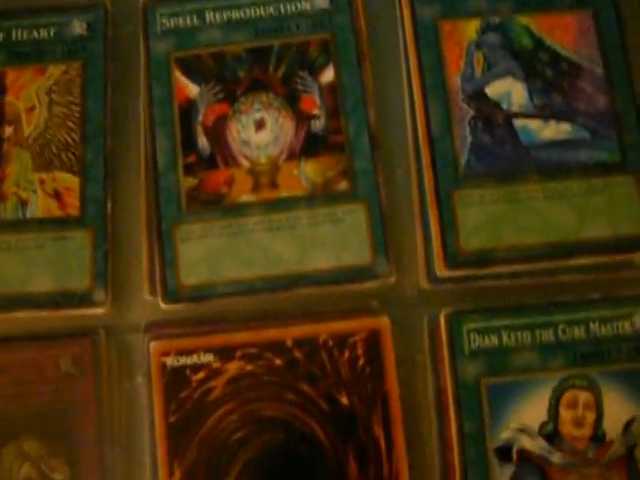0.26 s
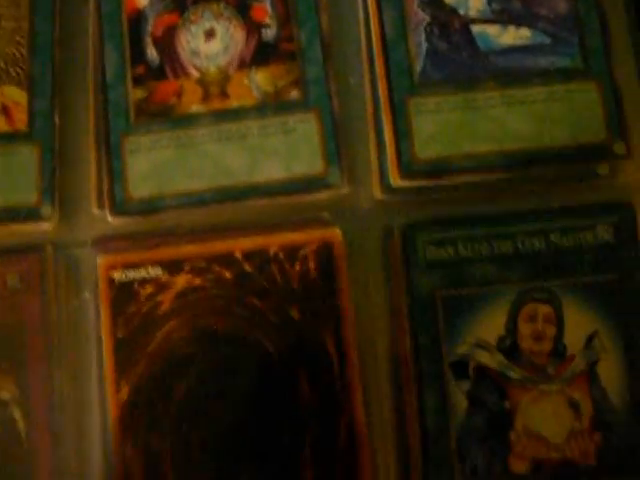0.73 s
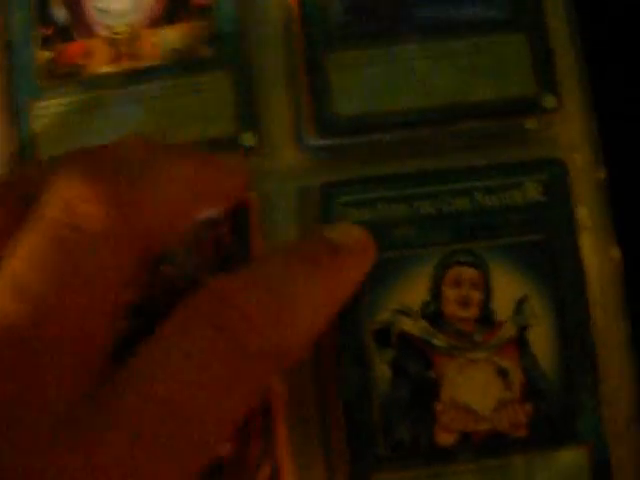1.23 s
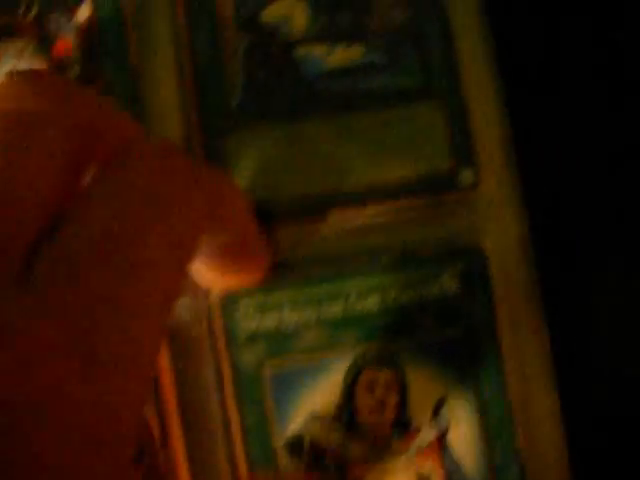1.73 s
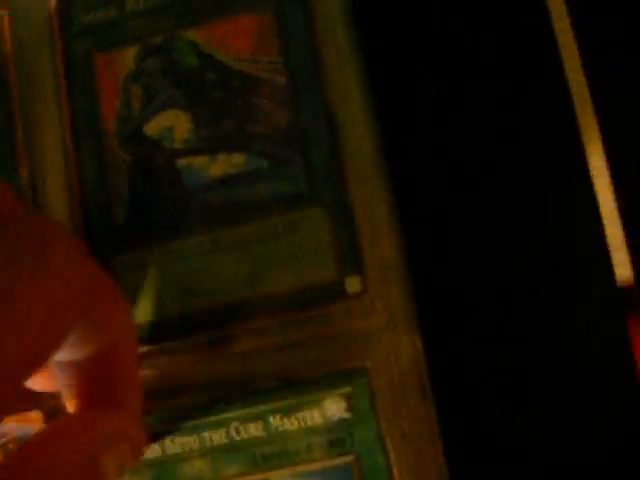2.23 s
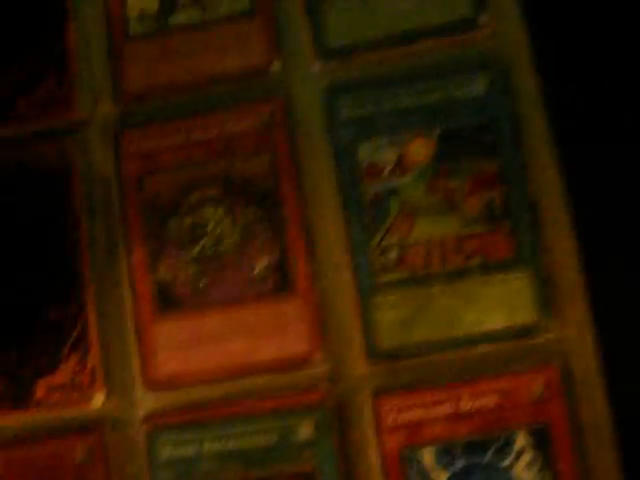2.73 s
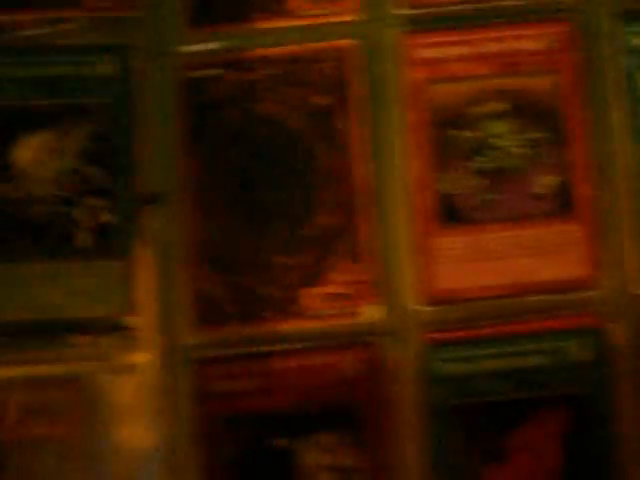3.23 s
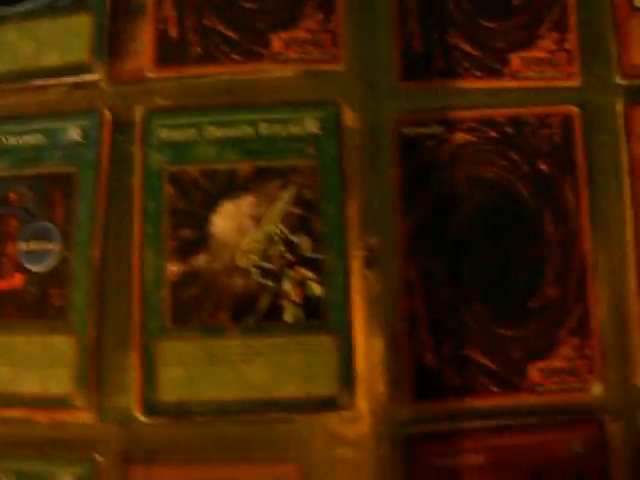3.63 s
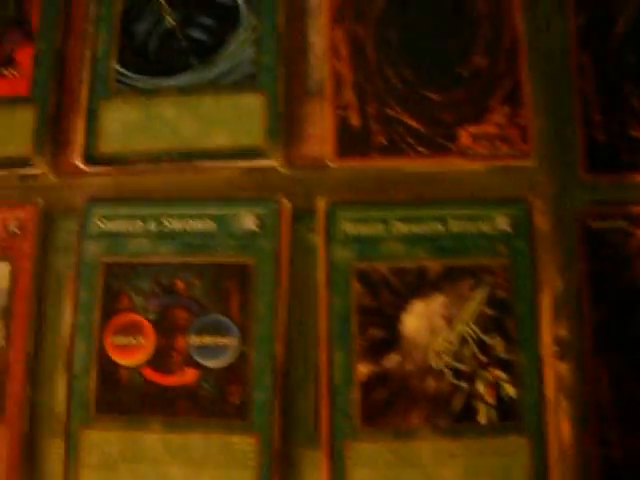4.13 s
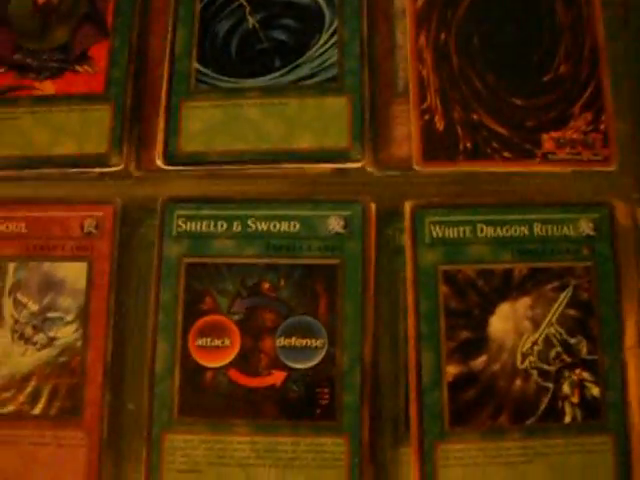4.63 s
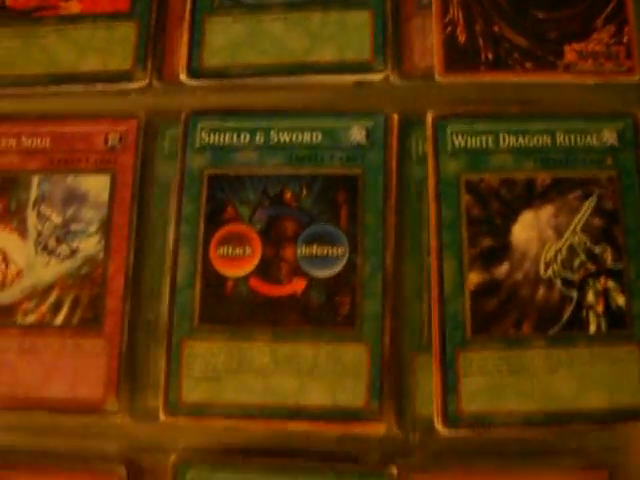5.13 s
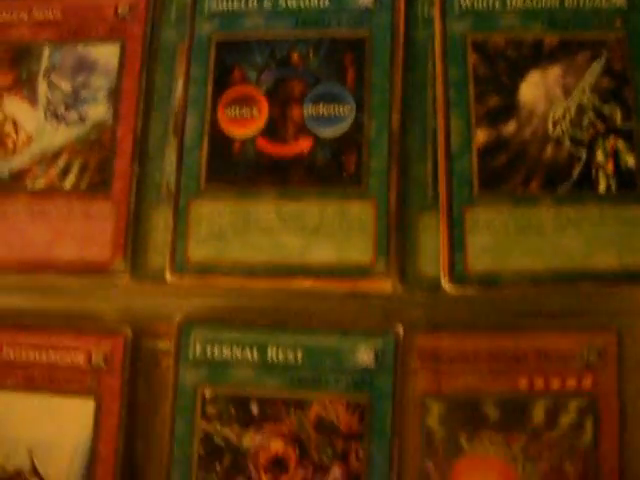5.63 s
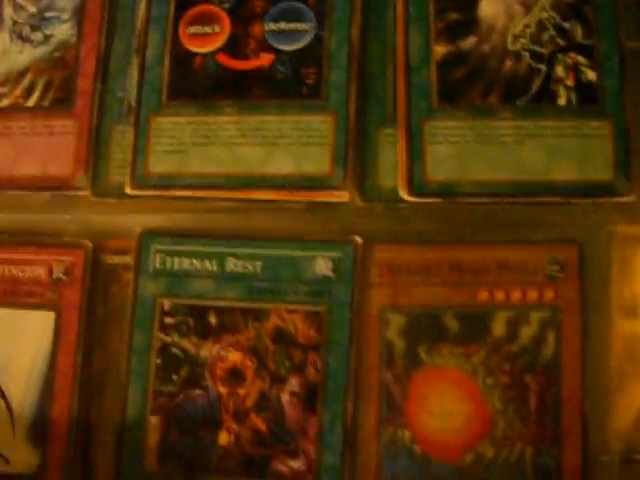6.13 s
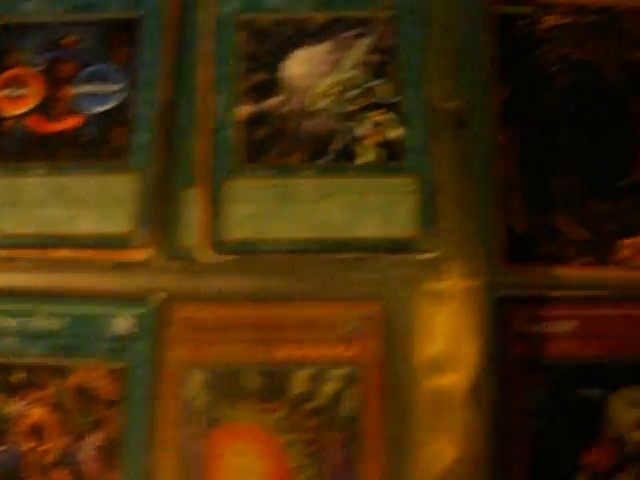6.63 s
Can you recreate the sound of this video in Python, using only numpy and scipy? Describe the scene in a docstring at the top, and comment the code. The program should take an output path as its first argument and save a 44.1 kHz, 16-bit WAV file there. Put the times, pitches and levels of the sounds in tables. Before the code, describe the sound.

Over constant hiss, a binder page of plastic card pockets is handled, giving irregular crackles, sharp pops and a few dull knocks.

```python
"""Microphone hiss, then plastic film crinkling: a hand works over a binder page of card sleeves.
The film slides in tiny stick-slips and rubs the page; the binder bumps softly on its support.
Pockets buckle with sharp snaps that ring film, page and binder in a small room.
A close camera picks it up, hears little above 4 kHz and overloads on the hardest snaps."""
import sys
import numpy as np
from scipy import signal
from scipy.fft import rfft, irfft, next_fast_len
from scipy.io import wavfile

SR = 44100
rng = np.random.default_rng(int(sys.argv[2]) if len(sys.argv) > 2 else 0)


def bounce(signal):
    """Save signal as a 16-bit WAV file at the path given by the first command-line argument."""
    frames = np.transpose(np.atleast_2d(signal))
    limited = np.clip(frames, -1, 1)
    pcm = np.round(limited * 32767).astype(np.int16)
    wavfile.write(sys.argv[1], SR, pcm)


N = 303408

# Pocket buckles. Small taut patch: bright. Clean flip: focused. The place sets the page knock.
# (time [s], film [dB], brightness [dB/octave], focus [dB], page [dB], page [Hz])
POCKET_SNAPS = [(1.799, -5, 9, 2.5, -6, 820), (1.8354, -12.5, 5, -5, -12.5, 690),
                (2.2066, 24, 5, 23.5, 15, 440), (2.3422, -0.5, 2, 15.5, 2, 830),
                (2.492, 26, -1, 4.5, 24, 930), (2.5134, 14, 7.5, 2.5, 22, 800),
                (2.6803, 7, -12, 4, 7.5, 1000), (2.702, -2, 8, 6, -4.5, 720),
                (2.739, -5, 9.5, -4, 4.5, 580), (2.7462, 5.5, 9, -7.5, 11, 560),
                (2.8333, 1.5, -8, 7, 11, 480), (2.9714, 0, -3, 2.5, 8, 710), (3.0199, 2.5, 1, 7, 8, 520),
                (3.0383, 10.5, 5, 8.5, 14, 430), (3.0409, 1, -17, 7, 21, 700),
                (3.0519, -7, -6, -3, 12, 690), (3.2528, -14, 17, -6, -3, 650),
                (3.5473, -2, -13.5, 4, 1, 930), (3.644, -2, -16, 11, -4, 775),
                (3.7796, 26.5, -6, 6.5, 28, 610), (4.0639, -3, -1, 13.5, 2.5, 930),
                (4.2017, 16.5, 16, 18.5, 8, 710), (4.296, -2.5, 0, 11, -10, 660),
                (4.3299, -9.5, -18, 3.5, -7, 840), (4.4337, 1, 5, 10, -7.5, 420),
                (4.5246, -4, 18, 9.5, -8, 800), (4.5479, 0, 16, 11.5, 1, 690),
                (4.695, 2.5, -15.5, 8.5, 1, 930), (4.7006, 9.5, 6, 20, -20, 790),
                (4.7218, 22, 2.5, 6, 11, 600), (4.7228, 15.5, 2.5, -2.5, 2, 600),
                         (4.7301, 9, 20, 9, 8, 840), (4.7406, 7.5, 2.5, 10, -7, 432),
                (4.832, 5, 3, -6, -2, 764), (5.0295, -5, -14.5, 4.5, -0.5, 850),
                (5.0552, -7, -6.5, 18, -2, 810), (5.1403, 6, -5, -3.5, 11, 890),
                (5.1866, -4, -11, 6, -0.5, 785), (5.1966, 9.5, -12.5, 5.5, 14.5, 516)]
# pocket film modes (centre [Hz], width [Hz])
FILM_MODES = [(1400, 580), (2380, 1154), (3350, 2060)]
# binder knock mode (centre [Hz], width [Hz])
BINDER_MODE = (199, 120)
# echoes off table and camera body (delay [s], gain [ratio])
NEAR_ECHOES = [(.0018, 0.11), (.0083, 0.074), (0.0103, .08), (0.019, 0.015)]
# room decay (frequency [Hz], t60 [s])
ROOM_T60 = [(150, 0.41), (700, .22), (2500, 0.18), (5000, 0.23)]
# film slides (midpoint [s], length [s], crinkle [dB], page rub [dB])
FILM_STROKES = [(1.106, 0.027, -42.5, -68), (1.456, .07, -48.5, -83), (1.507, .013, -30, -47),
                (1.827, 0.43, -51, -56), (2.189, 0.046, -44.5, -60), (2.459, .05, -55, -45.5),
                (2.778, 0.039, -45, -63), (2.965, 0.1, -58, -45), (3.028, 0.01, -39.5, -30),
                (3.086, 0.04, -55, -40.5), (3.265, 0.018, -42.5, -45), (3.352, 0.094, -46, -44),
                (3.52, 0.036, -48, -51.5), (3.642, .07, -49.5, -44.5), (4.047, 0.026, -45, -49.5),
                (4.759, .05, -44.5, -61)]
# crinkle colour (frequency [Hz], level [dB])
CRINKLE_SPECTRUM = [(300, -35), (1000, -4), (2000, -3), (3200, 1), (4500, -3), (5500, -6), (8000, -65)]
# binder bumps (time [s], ring [dB], thud [dB])
BINDER_BUMPS = [(1.592, -36, -68), (1.662, -39.5, -74), (1.7209, -18.5, -53), (1.814, -32.5, -55),
                (1.84, -35.5, -54), (1.892, -30.5, -70), (2.823, -28, -33), (2.8329, -36.5, -24.5),
                (3.02, -55, -25), (3.042, -33.5, -36.5), (3.083, -51, -35)]
# modes of the binder on its support (frequency [Hz], level [dB], t60 [s])
SUPPORT_MODES = [(146.5, -7, 0.2), (162.7, 5.5, 0.058), (450, -18, 0.11)]
# hiss colour (frequency [Hz], level [dB])
HISS_SPECTRUM = [(10, -8), (35, 7.5), (80, 6), (200, 2.5), (600, 3.5), (1500, 1), (3000, -1), (5000, -8),
                 (6500, -37)]
# rumble colour (frequency [Hz], level [dB])
RUMBLE_SPECTRUM = [(8, -4.5), (25, 3.5), (45, -3), (100, -16), (250, -21), (800, -55.5)]
# background dips, placed after hard snaps (time [s], depth [dB])
BACKGROUND_DIPS = [(2.5, 4), (3.799, 3.5), (4.73, 5)]
# camera microphone response (frequency [Hz], gain [dB])
MIC_RESPONSE = [(3400, 0), (3750, -1.5), (3900, -11), (4010, -13.5), (4130, -11), (4300, -7.5),
                (4650, -15.5), (5000, -30.5), (5300, -43.5), (6000, -85)]

LEAD_S = 0.004  # a pocket starts to give this long before it flips


def snaps(ring_db=-13, ring_t60_s=0.13, page_width_hz=480, leak_hz=370, leak_width_hz=370):
    """Each buckle sounds through the pocket film, the card-filled page and the binder."""
    out = np.zeros(N)
    octaves = np.log2([hz / FILM_MODES[1][0] for hz, _ in FILM_MODES])
    for time_s, film_db, tilt_db_per_oct, focus_db, page_db, page_hz in POCKET_SNAPS:
        # tilt about the middle mode; focus lowers the outer two
        gains = amp(film_db + tilt_db_per_oct * octaves - focus_db * (octaves != 0))
        binder_db = -5.5 + 0.21 * film_db

        def body(f):
            film = sum(gain * resonance(f, *mode) ** 2 for mode, gain in zip(FILM_MODES, gains))
            page = amp(page_db) * resonance(f, page_hz, page_width_hz) ** 2
            # bass leaks round the thin page instead of radiating
            highpass = f ** 2 / (leak_hz ** 2 - f ** 2 + 1j * f * leak_width_hz)
            radiation = highpass ** 2 * 1j * f / (leak_hz + 1j * f)
            return radiation * (film + page) + amp(binder_db) * resonance(f, *BINDER_MODE)

        push = buckle()
        add(out, time_s - LEAD_S, filtered(push, body))
        # the heavy page rings on after the film
        t = np.arange(len(push)) / SR
        burst = rng.standard_normal(len(t)) * amp(-60 * t / ring_t60_s)
        ring = filtered(burst / np.linalg.norm(burst), lambda f: resonance(f, 720, 580) ** 2)
        add(out, time_s, amp(page_db + ring_db) * ring)
    return out


def buckle(creak_db=-15, creak_rise_s=0.0007, flutter_db=-12, flutter_t60_s=0.011, room_db=-18):
    """Film creaks, flips and flutters; near surfaces and the room answer."""
    tail = room_tail()
    t = np.arange(len(tail)) / SR - LEAD_S
    flip = round(LEAD_S * SR)
    grit = lambda envelope: unit(rng.standard_normal(len(t)) * envelope) / np.sqrt(len(t))
    creak = grit((t < 0) * np.exp(-abs(t) / creak_rise_s))
    flutter = grit((t > 0) * amp(-60 * abs(t) / flutter_t60_s) * (1 - np.exp(-abs(t) / 0.0019)))
    push = amp(creak_db) * creak + amp(flutter_db) * flutter
    push[flip] += 1
    for delay_s, gain in NEAR_ECHOES:  # paths shift as page and camera move
        shifted_s = abs(delay_s * (1 + 0.08 * rng.standard_normal()))
        push[flip + round(shifted_s * SR)] += gain
    add(push, LEAD_S, amp(room_db) * tail)
    return push


def strokes(tick_db=-6, rub_hz=754, rub_width_hz=250):
    """Sliding film crinkles, with stray ticks, and rubs a hollow note out of the page."""
    out, t = np.zeros(N), np.arange(N) / SR
    crinkle = unit(coloured(slips(rate_per_s=2500, spread_db=5), CRINKLE_SPECTRUM))
    ticks = unit(coloured(slips(rate_per_s=160, spread_db=0.5), CRINKLE_SPECTRUM))
    crinkle += amp(tick_db) * ticks
    friction = slips(rate_per_s=820, spread_db=0.5)
    rub = unit(filtered(friction, lambda f: resonance(f, rub_hz, rub_width_hz) ** 2))
    for middle_s, length_s, crinkle_db, rub_db in FILM_STROKES:
        pressure = np.exp(-2 * ((t - middle_s) / length_s) ** 2)
        out += pressure * (amp(crinkle_db) * crinkle + amp(rub_db) * rub)
    return out


def slips(rate_per_s, spread_db):
    """Tiny stick-slip releases of uneven size."""
    releases = rng.random(N) < rate_per_s / SR
    return releases * rng.standard_normal(N) * amp(spread_db * rng.standard_normal(N))


def bumps(attack_s=0.006, thud_hz=85, thud_t60_s=0.05, knock_gain_db=42.5):
    """Soft pushes ring the binder on its support; firm ones thud and knock its cover."""
    out, t = np.zeros(N), np.arange(SR // 3) / SR
    thud = np.sin(2 * np.pi * thud_hz * t) * amp(-60 * t / thud_t60_s)
    onset = 1 - np.exp(-(t / attack_s) ** 2)
    for time_s, ring_db, thud_db in BINDER_BUMPS:
        ring = np.zeros(len(t))
        for hz, level_db, t60_s in SUPPORT_MODES:
            detuned_hz = hz * (1 + 0.01 * rng.standard_normal())
            ring += amp(level_db - 60 * t / t60_s) * np.sin(2 * np.pi * detuned_hz * t)
        add(out, time_s, amp(ring_db) * ring * onset + amp(thud_db) * thud)
        knock = filtered(buckle(), lambda f: resonance(f, *BINDER_MODE))
        add(out, time_s - LEAD_S, amp(thud_db + knock_gain_db) * knock)
    return out


def room_tail(rise_s=0.0014):
    """Diffuse tail of energy 1; each frequency decays at its own rate."""
    hz, t, spectrum = signal.stft(rng.standard_normal(SR // 3), SR, nperseg=256)
    decay = amp(-60 * t / along(ROOM_T60, hz)[:, None])
    _, tail = signal.istft(spectrum * decay, SR, nperseg=256)
    tail *= 1 - np.exp(-np.arange(len(tail)) / SR / rise_s)
    return tail / np.linalg.norm(tail)


def background(hiss_start_db=-44.5, rumble_start_db=-53.5, drift_db_per_s=-0.3174,
               fall_s=0.034, hold_s=0.72, recover_s=0.54):
    """Microphone hiss over faint rumble; both fade slowly, and dip and recover together."""
    t = np.arange(N) / SR
    corners_s = np.cumsum([0, fall_s, hold_s, recover_s])
    dips_db = [depth_db * np.interp(t - time_s, corners_s, [0, 1, 1, 0])
               for time_s, depth_db in BACKGROUND_DIPS]
    hiss = amp(hiss_start_db) * unit(coloured(rng.standard_normal(N), HISS_SPECTRUM))
    rumble = amp(rumble_start_db) * unit(coloured(rng.standard_normal(N), RUMBLE_SPECTRUM))
    return amp(drift_db_per_s * t - np.max(dips_db, axis=0)) * (hiss + rumble)


def amp(db):
    """Decibels to gain."""
    return 10 ** (np.asarray(db) / 20)


def unit(x):
    """Scale to rms 1."""
    return x / np.sqrt(np.mean(x ** 2) + 1e-20)


def along(points, hz):
    """Interpolate (frequency [Hz], value) points on a log axis."""
    point_hz, values = np.transpose(points)
    return np.interp(np.log(hz + 1), np.log(point_hz + 1), values)


def filtered(x, response):
    """Apply a complex frequency response."""
    size = next_fast_len(len(x) + 8192)
    hz = np.fft.rfftfreq(size, 1 / SR)
    return irfft(rfft(x, size) * response(hz), size)[:len(x)]


def coloured(x, points):
    """Apply a (frequency [Hz], gain [dB]) curve."""
    return filtered(x, lambda hz: amp(along(points, hz)))


def resonance(f, centre_hz, width_hz):
    """Causal response of one damped mode."""
    return 1j * f * width_hz / (centre_hz ** 2 - f ** 2 + 1j * f * width_hz)


def add(track, time_s, sound):
    """Mix a sound into the track."""
    part = track[round(time_s * SR):][:len(sound)]
    part += sound[:len(part)]


def scene():
    """All sources at one microphone."""
    return (snaps() + strokes() + bumps() + background())[None]


def record(dry):
    """Narrow-band camera; the hardest snaps overload near full scale."""
    cutoff_hz = 15600
    overloaded = np.clip(coloured(dry[0], MIC_RESPONSE), -0.86, 0.9)
    return filtered(overloaded, lambda hz: 1 / (1 + (hz / cutoff_hz) ** 40))[None]


dry = scene()
out = record(dry)
bounce(out)
```